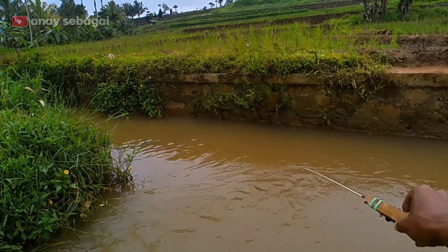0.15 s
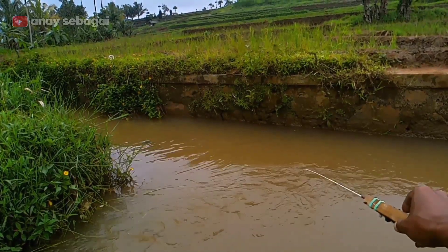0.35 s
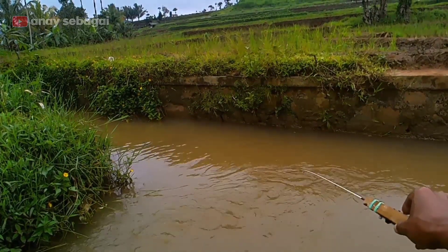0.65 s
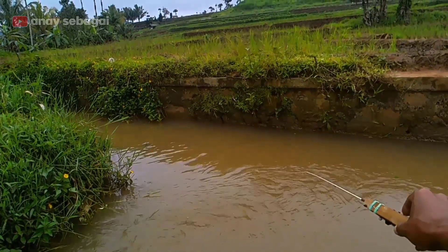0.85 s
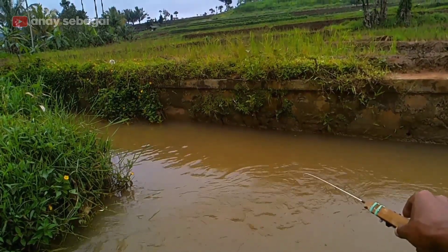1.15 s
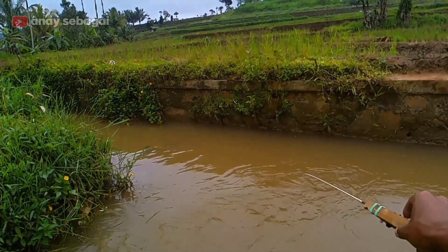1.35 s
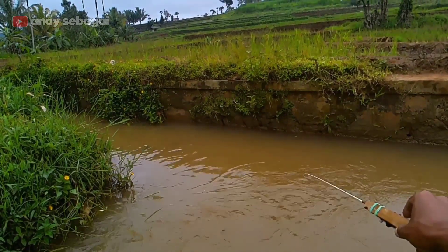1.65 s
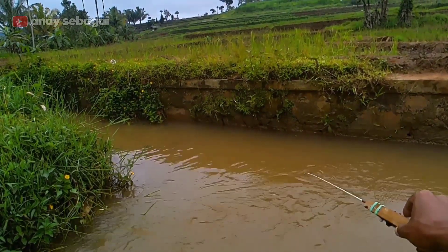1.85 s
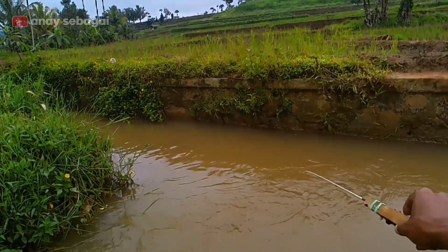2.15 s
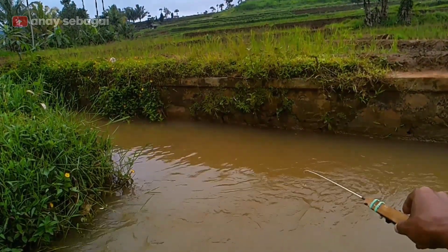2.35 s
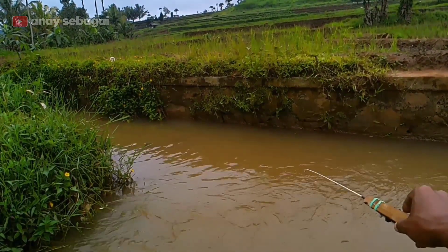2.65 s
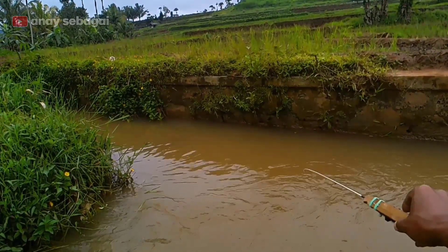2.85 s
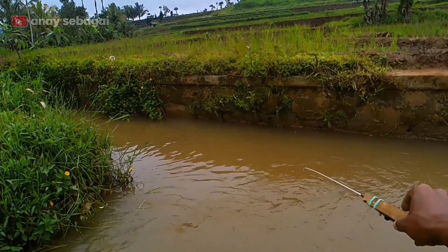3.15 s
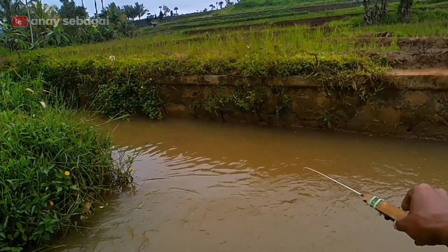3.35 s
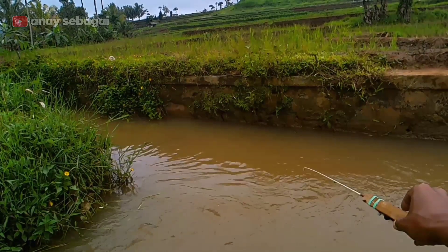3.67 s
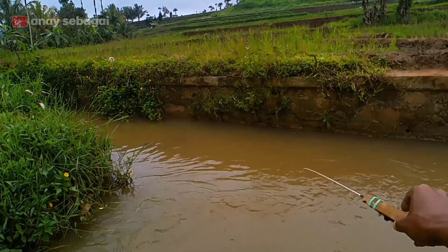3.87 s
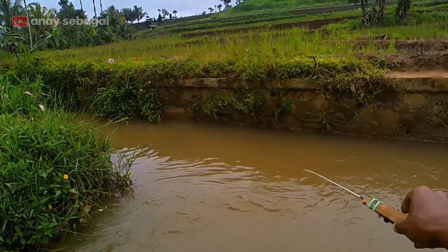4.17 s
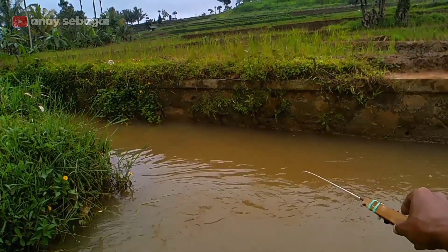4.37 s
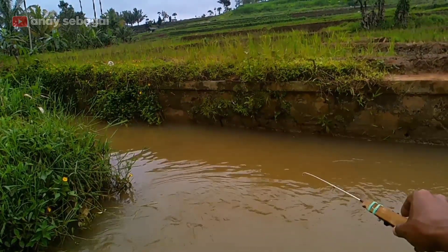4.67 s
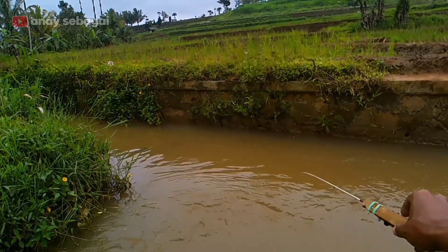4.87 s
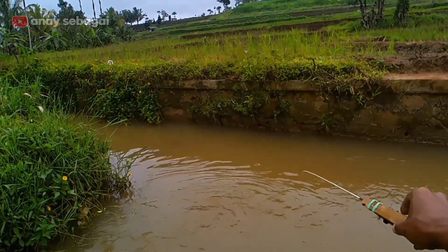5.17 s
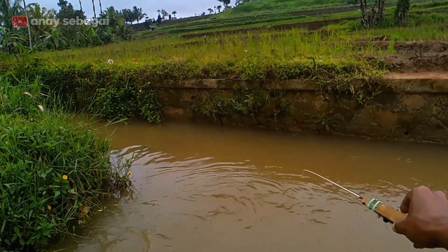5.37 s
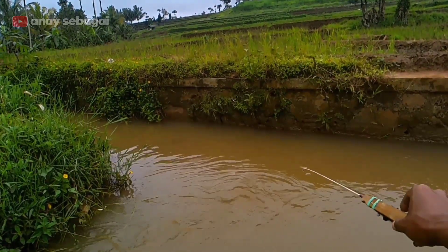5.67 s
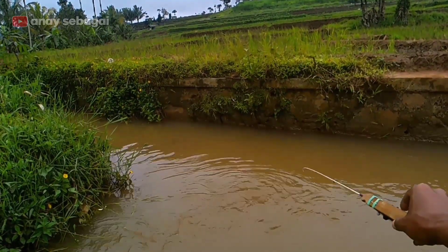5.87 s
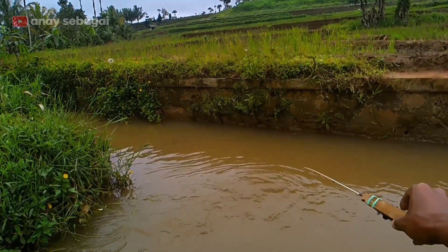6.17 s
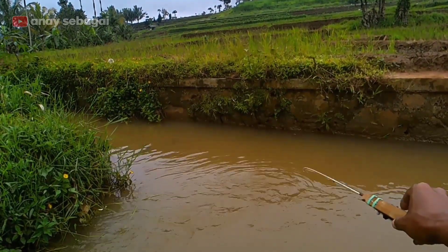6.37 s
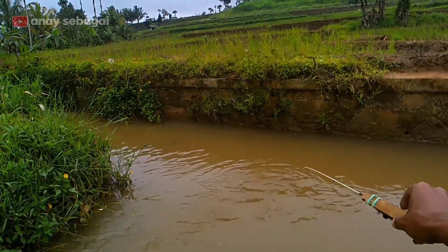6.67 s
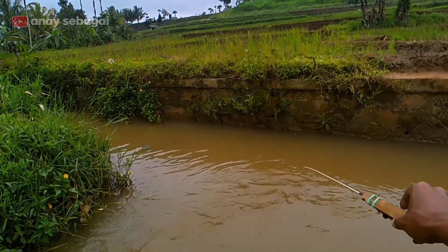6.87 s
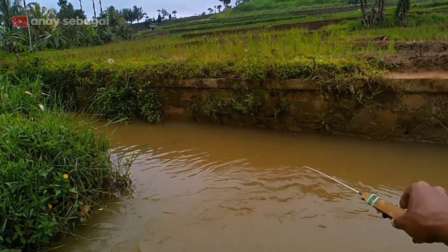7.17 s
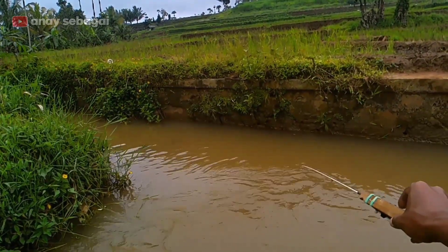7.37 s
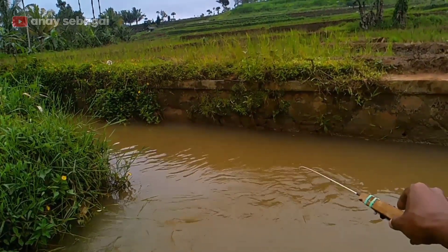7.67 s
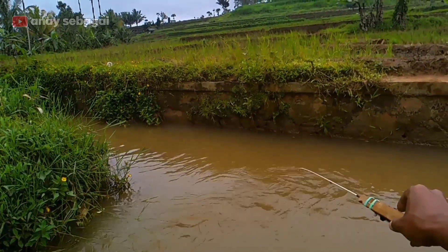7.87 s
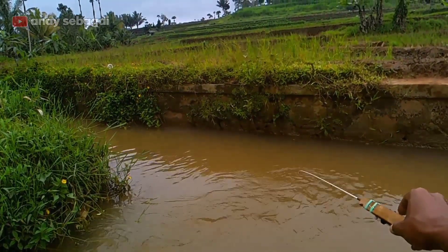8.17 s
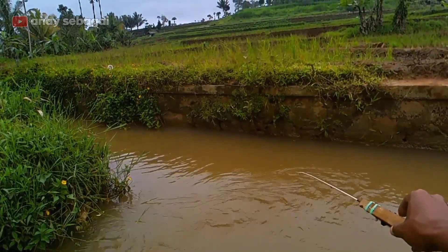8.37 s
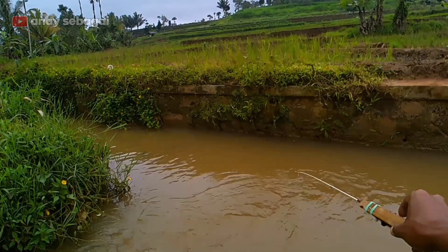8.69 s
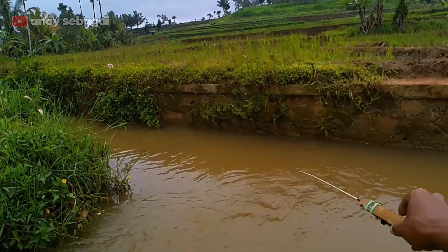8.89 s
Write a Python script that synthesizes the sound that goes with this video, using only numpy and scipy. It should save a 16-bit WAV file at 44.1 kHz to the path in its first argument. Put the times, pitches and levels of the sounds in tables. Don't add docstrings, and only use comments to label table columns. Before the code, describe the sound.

Outdoors by a muddy ditch among rice terraces, water runs in a steady dull wash with small bubbles. Crickets trill and chirp high above it; a close one pulses until just after four seconds, then two more distant ones take over. Occasional thin bird whistles and an unsteady far engine hum come and go. Near eight seconds wind thumps the open microphone.

```python
import sys
import numpy as np
from scipy import signal
from scipy.fft import rfft, irfft, next_fast_len
from scipy.io import wavfile
from scipy.ndimage import uniform_filter1d, map_coordinates

SR = 44100
rng = np.random.default_rng(int(sys.argv[2]) if len(sys.argv) > 2 else 0)


def output_pcm(signal):
    pcm = np.clip(np.atleast_2d(signal).T, -1, 1) * 32767
    wavfile.write(sys.argv[1], SR, np.round(pcm).astype(np.int16))


def decibels_to_gain(level_db):
    exponent = np.asarray(level_db, float) / 20
    return 10 ** exponent


N = 398223


def unit(x):
    return x / np.sqrt(np.mean(x ** 2) + 1e-20)


def curves(rows, outside=None):
    time_s, *columns = np.transpose(rows)
    return [np.interp(np.arange(N) / SR, time_s, c, outside, outside) for c in columns]


def wobble(rate_hz):
    knots = rng.standard_normal(int(N * rate_hz / SR) + 4)
    return map_coordinates(knots, [np.arange(N) * rate_hz / SR])


def coloured(x, spectrum):
    m = next_fast_len(N + 8192)
    hz, db = np.transpose(spectrum)
    log_hz = np.log(np.fft.rfftfreq(m, 1 / SR) + 1)
    gain = decibels_to_gain(np.interp(log_hz, np.log(hz + 1), db, -120, -120))
    return unit(irfft(rfft(x, m) * gain, m)[:N])


def patchy(patchy_db):
    z = signal.stft(rng.standard_normal(N + 1024), nperseg=512)[2]
    field = uniform_filter1d(rng.standard_normal(z.shape), size=6, axis=0)
    field = uniform_filter1d(field, size=14, axis=1)
    return signal.istft(z * decibels_to_gain(patchy_db * unit(field)), nperseg=512)[1][:N]


def bubbles(count, hz, spread, cycles, size_db):
    luck = rng.random((count, 2))
    t = np.arange(300) / SR
    f = hz * np.exp(spread * rng.standard_normal((count, 1)))
    size = decibels_to_gain(-size_db * np.log(1 - luck[:, 1:]))
    tone = np.sin(2 * np.pi * f * t * (1 + 0.032 * f * t / cycles))
    ring = size * tone * np.exp(-f * t / cycles) * (1 - np.exp(-f * t))
    at = (luck[:, :1] * N).astype(int) + np.arange(len(t))
    return np.bincount(at.ravel(), ring.ravel(), N + len(t))[:N]


def stream():
    # (frequency [Hz], level [dB])
    water = [(50, -17), (110, -1), (200, -4.5), (330, -8), (550, -11), (800, -10.5), (1330, -12),
             (1700, -17.5), (2290, -23.5), (2650, -24.5), (3100, -32.5), (4700, -44)]
    level_db = -46.6 + .3 * wobble(.9)
    wash = coloured(patchy(patchy_db=0.73), water)
    near = coloured(bubbles(count=4000, hz=1006, spread=0.502, cycles=1.97, size_db=2.0), water)
    return decibels_to_gain(level_db + 2.0 + 0.18 * wobble(7)) * unit(wash + decibels_to_gain(-11.0) * near)


def air():
    # (frequency [Hz], level [dB])
    hiss = [(2500, -9), (3300, -3.5), (4600, 0.5), (5200, -1.5), (5900, -3), (6500, -2.5), (7200, 0.5),
            (8050, 1), (8700, 0.5), (9900, -3.5), (11000, -5), (15000, -4.5), (18000, -11.5)]
    return decibels_to_gain(-59) * coloured(patchy(patchy_db=0.97), hiss)


def wind():
    # (time [s], level [dB])
    breeze = [(0, -46), (2, -47.5), (6.8, -47), (7.85, -41), (8.6, -43), (8.8, -46)]
    # (frequency [Hz], level [dB per Hz])
    rumble_colour = [(1, -6), (3, 0), (20, -1), (30, -2.5), (45, -1), (60, -2), (80, -7), (130, -14),
                     (250, -30)]
    # (time [s], peak level [dB])
    thumps = [
        (7.885, -31),
        (7.976, -27),
        (8.05, -45),
        (8.16, -32),
        (8.23, -43),
        (8.35, -39),
        (8.62, -38),
    ]
    level_db = curves(breeze)[0] + 1.1 * wobble(1.6)
    lumps = decibels_to_gain(1.27 * wobble(9))
    rumble = decibels_to_gain(level_db + 3.5) * unit(lumps * coloured(rng.standard_normal(N), rumble_colour))
    t = np.arange(N) / SR
    for thump_s, peak_db in thumps:
        u = (t - thump_s) * 42
        rumble = rumble + decibels_to_gain(peak_db) * np.cos(2 * np.pi * u) * np.exp(-(u / 0.54) ** 2)
    return rumble


def engine():
    # (time [s], firing rate [Hz], level [dB])
    running = [(0, 100, -45.5), (.6, 96, -55.5), (2.1, 94, -58), (2.6, 93.16, -48.5), (3.2, 93, -48),
               (3.7, 91, -55), (5.2, 96, -48.5), (5.4, 96, -58)]
    hz, db = curves(running)
    turns = np.cumsum(hz + 4.62 * wobble(12)) / SR
    half_order = decibels_to_gain(-7.5 + 1.7 * wobble(2.6)) * np.sin(np.pi * turns)
    hum = np.sin(2 * np.pi * turns) + half_order
    fade = np.clip((running[-1][0] - np.arange(N) / SR) / .15, 0, 1)
    return fade * np.sqrt(2) * decibels_to_gain(db - 1.0 + 2.7 * wobble(7.2)) * hum


def wings(strokes, wing, duty, skew, scatter_db, side_db=-60):
    rough = {"low": (7468, 200, 1.5, .45), "far": (7400, 260, 2.5, .6), "high": (7810, 380, .9, .75),
             "near": (9155, 780, 2.5, .3), "second": (9150, 700, 2.5, .35), "third": (9500, 600, 2.5, .4)}
    hz, fall_hz, slip_rad, rasp_rad = rough[wing]
    climb_hz_per_s = 20 * (wing == "near")
    k = np.floor(strokes).astype(int)
    k = k - k.min()
    luck = rng.standard_normal((k.max() + 1, 2))
    u = np.clip((strokes % 1) / np.clip(duty, .2, 1), 0, 1) ** skew
    shape = np.sin(np.pi * u) ** 2 * decibels_to_gain(scatter_db * luck[k, 0])
    pitch_hz = hz + climb_hz_per_s * (np.arange(N) / SR - 2.6) + fall_hz * (.5 - u) * (u < 1)
    shake = np.cumsum(slip_rad * luck[:, 1] - 3.3)[k] + rasp_rad * wobble(1300)
    phase = 2 * np.pi * np.cumsum(pitch_hz) / SR + shake
    return unit(shape * (np.sin(phase) + decibels_to_gain(side_db) * np.sin(.93 * phase)))


def phrases(wing):
    trill_phrases = {"low": [(6.33, .04, 8.7, -61.5, 0)], "far": [(1.8, 4, 6.4, -61.5, -1.2),
                     (6.4, 0.011, 8.7, -69, 2.5)], "high": [(-.1, .01, .4, -71, -4),
                     (.39, .03, 2.27, -64.5, 0), (8.74, .03, 9.2, -70.5, 1.5)]}
    release_s = .035
    t = np.arange(N) / SR
    gain = np.zeros(N)
    for start_s, rise_s, stop_s, db, grow_db in trill_phrases[wing]:
        rise = np.clip((t - start_s) / rise_s, 0, 1)
        release = np.clip((stop_s - t) / release_s + 1, 0, 1)
        gain += rise * release * decibels_to_gain(db + grow_db * (t - start_s) / (stop_s - start_s))
    return gain


def trills():
    t = np.arange(N) / SR
    drift = wobble(2)
    low_strokes = 116.8 * t + .02 * drift
    far_strokes = 116.8 * t - .12 + .05 * drift
    high_strokes = 119.15 * t + .25 + .06 * drift
    low = phrases("low") * wings(low_strokes, "low", duty=0.728, skew=1.2, scatter_db=1.0)
    far = phrases("far") * wings(far_strokes, "far", duty=.7, skew=1.4, scatter_db=1.5)
    high = phrases("high") * wings(high_strokes, "high", duty=0.75, skew=1.5, scatter_db=1.0)
    return low + far + high


def slowing(rhythm):
    end_s, period_s, slowing_s = rhythm
    k = np.arange(-20, 36)
    return end_s + period_s * k + slowing_s * k * k


def phrase(end_s, effort, scatter_db):
    time_s, db, pause_s, swell_db = np.transpose(effort)
    luck = rng.standard_normal((len(end_s), 2))
    beat_s = np.diff(end_s, prepend=2 * end_s[0] - end_s[1])
    length_s = beat_s - np.interp(end_s, time_s, pause_s) + .004 * luck[:, 1]
    level_db = np.interp(end_s, time_s, db, -120) + scatter_db * luck[:, 0]
    return np.transpose([end_s, length_s, level_db, np.interp(end_s, time_s, swell_db)])


def chirper(bursts, rate_hz, wing, side_db):
    t = np.arange(N) / SR
    end_s, length_s, db, swell_db = np.transpose(bursts)
    k = np.minimum(np.searchsorted(end_s, t), len(end_s) - 1)
    left_s = end_s[k] - t
    strokes = 60 * k - np.clip(left_s, -.1, .3) * rate_hz
    rise = np.clip((length_s[k] + 0.017 - left_s) / 0.014, 0, 1) * (left_s > 0)
    level = rise * decibels_to_gain(db[k] - 2 * swell_db[k] * left_s / length_s[k])
    return level * wings(strokes, wing, duty=1.0, skew=1.4, scatter_db=0.5, side_db=side_db)


def bank(x, t60_s):
    t = np.arange(SR // 4) / SR
    tail = rng.standard_normal(len(t)) * decibels_to_gain(-60 * t / t60_s)
    return signal.fftconvolve(x, tail / np.linalg.norm(tail))[:N]


def chirpers():
    # (burst number [1], its end [s])
    near_beats = [(0, .098), (3, .492), (7, .98), (21, 2.75), (24, 3.139), (26, 3.388), (30, 3.905),
                  (32, 4.189), (33, 4.298)]
    # (time [s], level [dB], pause between bursts [s], swell within a burst [dB])
    near_effort = [(0, -64.5, 0.036, 2), (2, -60, 0.038, 3.5), (4.3, -58, 0.037, .8)]
    second_effort = [(5, -75, .06, 1.5), (6.1, -64.5, 0.051, 1.5), (9.1, -61.5, .045, 1.3)]
    third_effort = [(1.8, -82, .05, 0.1), (4.3, -69, .045, 0.1), (5.3, -69, 0.04, .1),
                    (9.1, -64.5, .04, 0.1)]
    # (a burst end [s], period [s], slowing [s per burst squared])
    rhythms = [(6.091, .1202, .00021), (4.477, .1345, .00011)]
    number, end_s = np.transpose(near_beats)
    near_ends = np.interp(np.arange(number[-1] + 1), number, end_s)
    near_bursts = phrase(near_ends, near_effort, scatter_db=0.8)
    second_bursts = phrase(slowing(rhythms[0]), second_effort, scatter_db=.7)
    third_bursts = phrase(slowing(rhythms[1]), third_effort, scatter_db=.9)
    near = decibels_to_gain(1.5) * chirper(near_bursts, 122.8, "near", side_db=-14)
    second = decibels_to_gain(3.0) * chirper(second_bursts, 121.0, "second", side_db=-19.0)
    third = chirper(third_bursts, 118, "third", side_db=-17)
    return near + second + third + decibels_to_gain(-4.5) * bank(second + third, t60_s=0.22)


def bird():
    # (start [s], length [s], from [Hz], to [Hz], level [dB])
    whistles = [
        (.65, .085, 4610, 4440, -61),
        (.74, .08, 4400, 4280, -69),
        (.887, .062, 4880, 4700, -59.5),
        (3.245, .13, 4660, 4000, -58.5),
        (5.077, .085, 3780, 4420, -66.5),
        (6.945, 0.14, 4540, 4040, -63.5),
        (8.118, .06, 3760, 4000, -65),
    ]
    bend, scoop_hz, scoop_s = 1.8, 249.5, 0.0051
    flutter_hz, flutter_db, db_per_hz, swell_s = 27, 2.5, 0.0117, 0.023
    out = np.zeros(N)
    for start_s, length_s, from_hz, to_hz, db in whistles:
        t = np.clip(np.arange(N) / SR - start_s, 0, length_s)
        glide_hz = from_hz + (to_hz - from_hz) * (t / length_s) ** bend
        hz = glide_hz - scoop_hz * np.exp(-t / scoop_s)
        edge = np.clip(np.minimum(t, length_s - t) / swell_s, 0, 1)
        dip_db = flutter_db * (1 + np.cos(2 * np.pi * flutter_hz * t))
        level_db = db + db_per_hz * (hz - from_hz) - dip_db + 2.2 * wobble(90)
        phase = 2 * np.pi * np.cumsum(hz) / SR + 0.77 * wobble(150)
        out += edge * np.sqrt(2) * decibels_to_gain(level_db) * np.sin(phase)
    return out


def scene():
    singers = trills() + chirpers() + decibels_to_gain(-0.8) * bird()
    echoes = decibels_to_gain(-11.5) * bank(singers, t60_s=.18)
    return (singers + echoes + air() + stream() + wind() + engine())[None]


def starved(x):
    # (band from [Hz], to [Hz], singer from [Hz], to [Hz], share of the loudest moments [1])
    starved_bands = [(7650, 8120, 8900, 9600, .16), (8120, 8440, 8900, 9600, .16),
                     (6250, 6600, 7200, 7700, .2), (12400, 13100, 13100, 13800, .08),
                     (13800, 14500, 14500, 15200, .08)]
    top_hz = 15480
    hz, _, z = signal.stft(x, SR, nperseg=1024)
    for lo_hz, hi_hz, singer_lo_hz, singer_hi_hz, share in starved_bands:
        singer = (hz > singer_lo_hz) & (hz < singer_hi_hz)
        band = (hz > lo_hz) & (hz < hi_hz)
        loud = np.sum(abs(z[..., singer, :]) ** 2, axis=-2)
        drop = (loud > np.quantile(loud, 1 - share)) & (rng.random(loud.shape) < .38)
        z = z * np.where(drop[:, None] & band[:, None], decibels_to_gain(-18), 1)
    return signal.istft(z * (hz < top_hz)[:, None], SR, nperseg=1024)[1][:, :N]


def top_cut(x):
    return signal.sosfilt(signal.butter(12, 16200, fs=SR, output="sos"), x)


def record(dry):
    offset = .0795
    return top_cut(starved(dry) + offset)


dry = scene()
out = record(dry)
output_pcm(out)
```